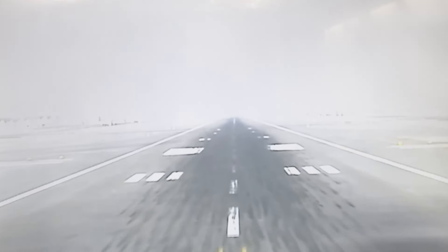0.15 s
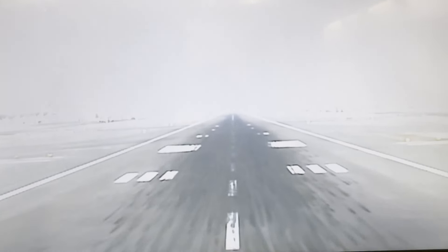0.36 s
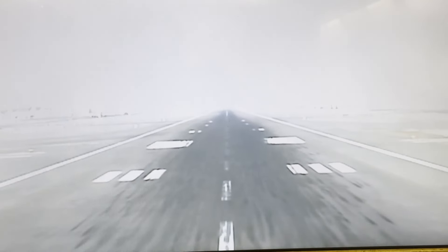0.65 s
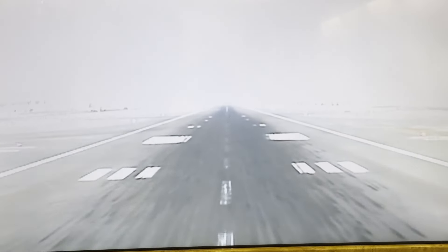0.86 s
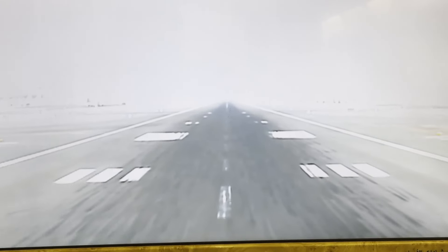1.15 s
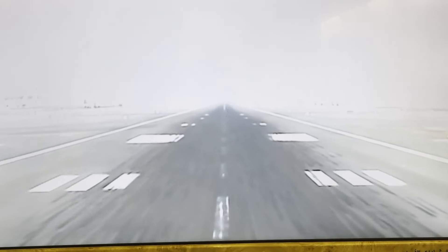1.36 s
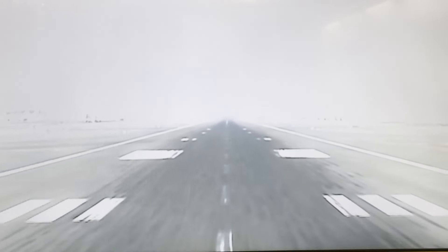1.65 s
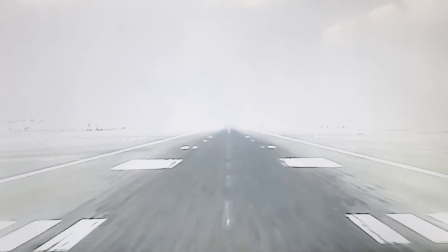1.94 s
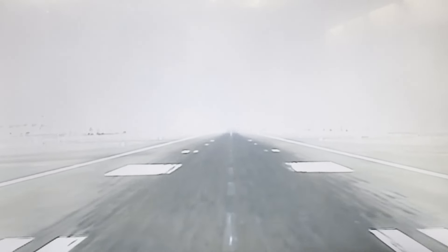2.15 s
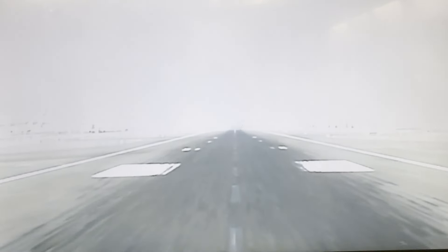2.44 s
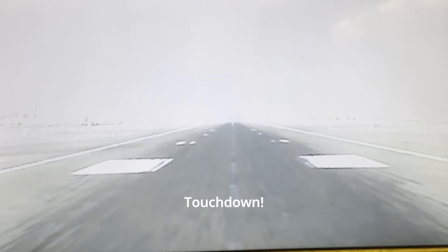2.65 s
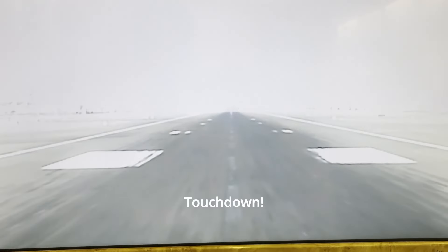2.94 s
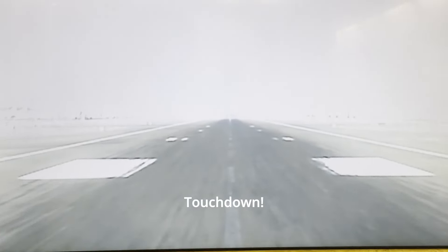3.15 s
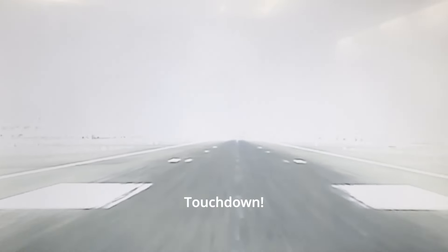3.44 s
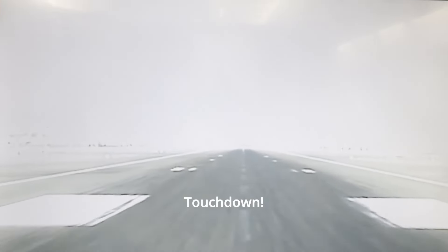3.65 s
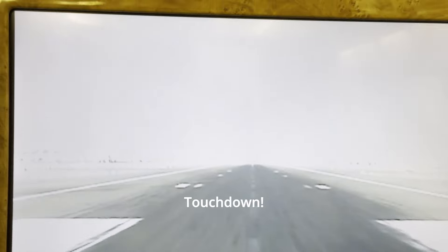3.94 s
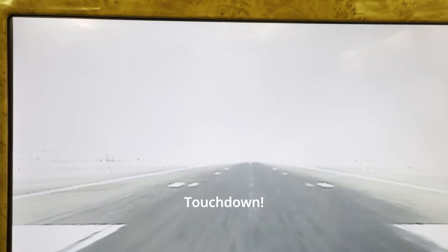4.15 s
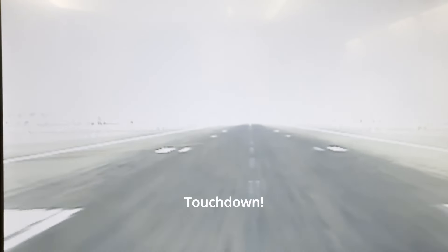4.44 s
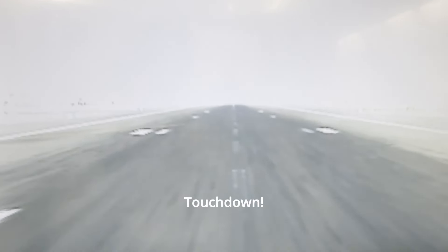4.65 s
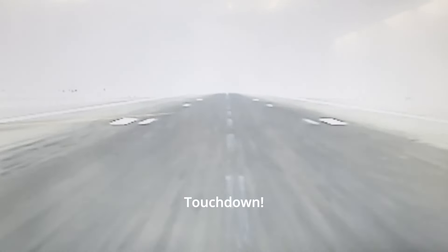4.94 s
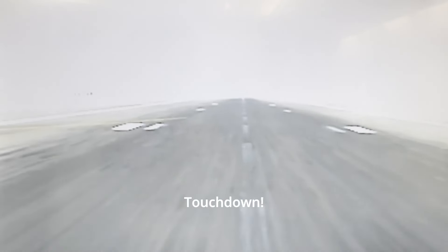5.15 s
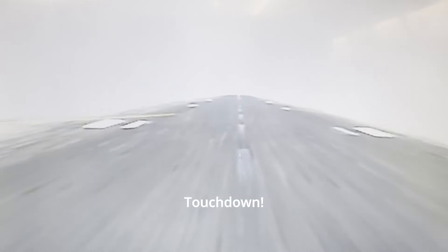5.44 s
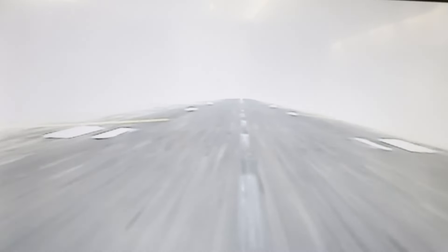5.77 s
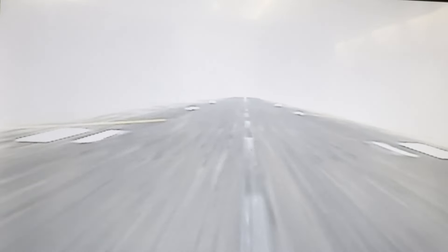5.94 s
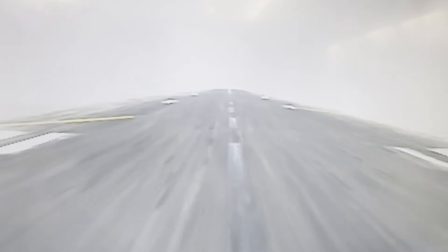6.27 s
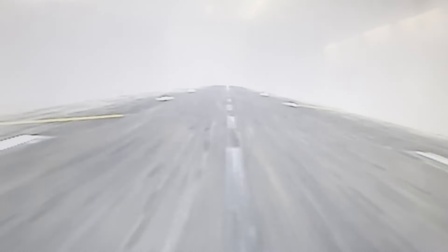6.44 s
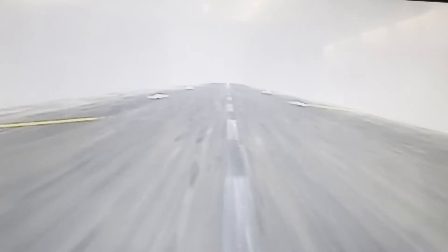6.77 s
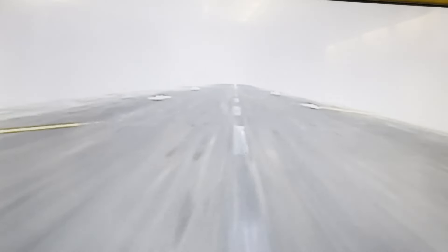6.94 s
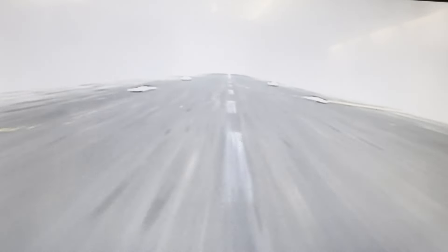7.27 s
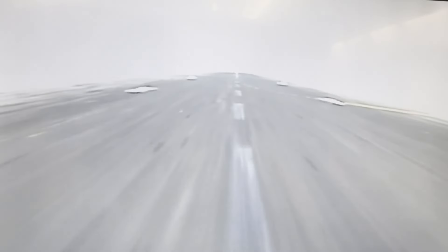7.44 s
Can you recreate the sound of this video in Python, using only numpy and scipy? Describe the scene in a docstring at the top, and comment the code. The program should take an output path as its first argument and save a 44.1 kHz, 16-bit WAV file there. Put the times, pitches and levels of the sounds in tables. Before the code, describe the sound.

Inside an airliner cabin, low air rush and thin fan whine, then a violent multi-thump touchdown with rattling trim, and a rumbling runway roll.

```python
"""Landing gear of an airliner meets the runway, heard from a cabin seat: each blow is a dispersed bending wave
plus decaying sines, over a fuselage boom of resonant noise that swells in timed surges.
Before touchdown, filtered noise makes the air rush and wavering sines the fan whine.
The tyre groan is narrow noise and the rolling roar wide noise; the nose wheel comes down later.
Trim rattles in clicks, joints creak, panels squeak as gliding tones, loose things chatter and scrape."""
import sys
import numpy as np
from scipy import signal
from scipy.fft import rfft, irfft, next_fast_len
from scipy.io import wavfile
from scipy.ndimage import uniform_filter1d

SR = 44100
rng = np.random.default_rng(int(sys.argv[2]) if len(sys.argv) > 2 else 0)


def wav_record(signal):
    """Record a signal, one row per channel, as 16-bit PCM in the file named by sys.argv[1]."""
    frames = np.transpose(np.atleast_2d(signal))
    bounded = np.clip(frames, -1, 1)
    # unit amplitude maps onto the largest positive 16-bit level
    quanta = np.round(bounded * 32767).astype(np.int16)
    wavfile.write(sys.argv[1], SR, quanta)


N = 335601
T = np.arange(N) / SR
SIZE = next_fast_len(N + 8192)
FREQ = np.maximum(np.arange(SIZE // 2 + 1) * SR / SIZE, 1)
SIDES = np.array([[1], [-1]])  # left, right
MAIN_TOUCH_S, NOSE_TOUCH_S = 2.36, 4.1


def undb(db):
    """Decibels to amplitude gain."""
    return 10 ** (np.asarray(db) / 20)


def unit(x):
    """Scale to rms 1."""
    return x / np.sqrt(np.mean(x ** 2))


def curve(rows):
    """Gain over time from (time_s, level_db) rows."""
    return undb(np.interp(T, *np.transpose(rows)))


def response(points):
    """Gain over frequency from (freq_hz, level_db) points, falling away beyond both ends."""
    hz, db = np.transpose(points)
    skirts = (np.minimum(FREQ / hz[0], 1) * np.minimum(hz[-1] / FREQ, 1)) ** 2
    return undb(np.interp(np.log(FREQ), np.log(hz), db)) * skirts


def resonances(modes):
    """Gain over frequency from (freq_hz, width_hz, level_db) resonances."""
    power = 0
    for hz, width_hz, db in modes:
        detune = (FREQ - hz) / (.75 * width_hz)
        power = power + undb(db) ** 2 / (1 + detune ** 2) ** 2
    return np.sqrt(power)


def above(corner_hz):
    """Gain of a gentle treble band starting at the corner."""
    return 1 - 1 / (1 + (FREQ / corner_hz) ** 4)


def filtered(x, gain):
    """Apply a frequency response."""
    return irfft(rfft(x, SIZE) * gain, SIZE)[..., :N]


def noise():
    """Two unrelated white noises."""
    return rng.standard_normal((2, N))


# Stereo width of the cabin's sound field: freq_hz, side_minus_mid_db
PORT_WIDTH = [(30, -32.5), (110, -16), (200, -12.5), (400, -10.5), (700, -6), (1300, -4.5), (2300, -17.5),
              (4400, -16), (8500, -100), (16000, 9.5)]


def diffuse(pair, gain):
    """Colour two unrelated signals and mix them as the cabin's sound field reaches both ports."""
    mid = filtered(pair[0], gain)
    side = filtered(pair[1], gain * response(PORT_WIDTH))
    return unit(np.array([mid + side, mid - side]))


def walk(rate_hz):
    """Smooth random wander with spread 1."""
    return unit(filtered(rng.standard_normal(N), np.exp(-(FREQ / rate_hz) ** 2)))


def steadied(x, window_s):
    """Even out the chance swells of a narrow noise."""
    power = uniform_filter1d(np.mean(x ** 2, axis=0), int(window_s * SR))
    return x / np.sqrt(power + 1e-6)


def decay(start_s, t60_s, rise_s):
    """Envelope of a blow: quick rise, exponential fall."""
    age = np.maximum(T - start_s, 0)
    return (1 - np.exp(-age / rise_s)) * np.exp(-np.minimum(np.log(1000) * age / t60_s, 50))


def held(start_s, hold_s, t60_s, rise_s):
    """Envelope of a sustained contact: linear rise, hold, exponential fall."""
    attack = np.clip((T - start_s) / rise_s, 0, 1)
    return attack * np.exp(-np.log(1000) * np.maximum(T - start_s - hold_s, 0) / t60_s)


# Spectrum of air rushing along the hull: freq_hz, relative_db
AIR_SPECTRUM = [(60, 2), (105, 2.5), (133, 0), (170, -1), (300, -12.5), (440, -15), (700, -21),
                (1050, -26.5), (1580, -28.5), (1900, -34), (3000, -35.5), (3800, -42.5), (6500, -42),
                (8800, -43.5), (12000, -44.5), (16000, -48)]
# Resonances sung by the passing air: freq_hz, width_hz, relative_db
AIR_HUMS = [(79.7, 8.4, 4.5), (163.2, 24, 7), (257.6, 53, -5.5), (439, 51, -11)]


def airflow(level_db=-28, hum_db=-33, flutter_db=1.55, rollout_db=-3.0, hum_left_db=3.0):
    """Turbulent air along the hull flutters slightly and eases as the aircraft slows."""
    rush = diffuse(noise(), response(AIR_SPECTRUM)) * undb(level_db + flutter_db * walk(4.5))
    hum_level_db = hum_db + flutter_db * walk(11) + hum_left_db * SIDES / 2
    hum = diffuse(noise(), resonances(AIR_HUMS)) * undb(hum_level_db)
    return (rush + hum) * curve([(2.6, 0.0096), (4.5, rollout_db)])


# Whine of fans and turbines: pitch_hz, level_db (rms, before flicker and the landing fade)
BLADE_TONES = [(1511, -57.5), (1588, -73), (3203, -80), (5958, -68), (6121, -77), (6713, -76.5)]


def fans(approach_db=-1, rollout_db=-3, waver_ratio=0.001, flicker_db=1.8,
         sough_hz=1590, sough_width_hz=130, sough_db=-57.5):
    """Rotating blades give thin wavering tones, in a narrow sough of air."""
    tones = 0
    for hz, db in BLADE_TONES:
        phase = 2 * np.pi * np.cumsum(hz * (1 + waver_ratio * walk(12.5))) / SR
        tones = tones + np.sqrt(2) * np.sin(phase) * undb(db + flicker_db * walk(3.5))
    sough = diffuse(noise(), resonances([(sough_hz, sough_width_hz, 0)])) * undb(sough_db)
    return tones * curve([(2.4, approach_db), (4.5, rollout_db)]) + sough


# Hull surges as struts bounce and wheels cross bumps: centre_s, length_s, level_db
HULL_SURGES = [(2.424, 0.11, -20), (2.506, 0.081, -10.5), (2.638, 0.058, -5), (2.696, 0.072, -9),
               (2.826, 0.043, -7), (2.882, 0.038, -6), (3.072, 0.17, -16), (3.257, 0.1, -14.5),
               (3.357, 0.045, -19), (3.5, 0.029, -17.5), (4.153, 0.068, -9), (4.288, 0.07, -11),
               (4.384, 0.069, -10.5), (4.51, 0.063, -12), (4.644, 0.1, -17), (4.803, 0.088, -14.5),
               (5.008, 0.083, -18.5), (5.2, 0.074, -20), (5.413, 0.11, -15.5), (5.852, 0.033, -14.5),
               (6.016, 0.06, -18), (6.15, 0.18, -21.5), (6.325, 0.14, -18.5), (6.586, 0.073, -19),
               (6.808, 0.12, -22), (7.224, 0.09, -16.5), (7.578, 0.031, -31)]
# steady shaking in each phase
FLIGHT_DB, MAIN_WHEELS_DB, ALL_WHEELS_DB = -27.5, -23.5, -21.5


def shaking_hull(settle_s=0.089, buffet_db=1.5, buffet_hz=6.8):
    """The hull shakes more with each set of wheels down, and surges on bounces and bumps."""
    main, nose = (np.clip((T - s) / settle_s + .5, 0, 1) for s in (MAIN_TOUCH_S, NOSE_TOUCH_S))
    steady_db = FLIGHT_DB + main * (MAIN_WHEELS_DB - FLIGHT_DB) + nose * (ALL_WHEELS_DB - MAIN_WHEELS_DB)
    power = undb(steady_db + buffet_db * walk(buffet_hz)) ** 2
    for centre_s, length_s, db in HULL_SURGES:
        offset = 2 * (T - centre_s) / length_s
        power = power + undb(db) ** 2 * np.exp(-np.minimum(offset ** 2, 50))
    return np.sqrt(power)


# Lowest resonances of the fuselage: freq_hz, width_hz, relative_db
FUSELAGE_MODES = [(42, 29, -9.5), (57.2, 11.4, 5.5), (74, 30.7, -3), (104.6, 6.8, -4)]


def fuselage(window_s=0.0436, judder_hz=53, judder_width_hz=8, heavy_db=-11):
    """The hull booms in its lowest resonances; under the heaviest load a single judder takes over."""
    shake = shaking_hull()
    load = 1 / (1 + (undb(heavy_db) / shake) ** 4)
    boom = steadied(diffuse(noise(), resonances(FUSELAGE_MODES)), window_s)
    judder = steadied(diffuse(noise(), resonances([(judder_hz, judder_width_hz, 0)])), window_s)
    return (np.sqrt(1 - load) * boom + np.sqrt(load) * judder) * shake


# Squeaks of plastic panels: centre_s, pitch_hz, half_length_s, level_db (before grip and overtone),
# glide_ratio (of pitch), roughness_ratio (of pitch)
PANEL_SQUEAKS = [(0.735, 3050, .15, -57, .008, .008), (0.76, 3205, .09, -50.5, -0.0028, 0.019),
                 (2.714, 2970, 0.02, -34.5, 0.046, .012), (2.783, 2700, .022, -37, 0.01, 0.0068),
                 (3.069, 3010, 0.022, -40, 0.032, 0.022), (3.128, 3350, 0.019, -51, 0, .02),
                 (3.605, 2460, .07, -48, 0, .05), (4.295, 1113, 0.027, -44, 0.0028, .02),
                 (4.416, 1050, 0.024, -46, 0, .03), (4.522, 3140, 0.042, -46.5, 0.0026, 0.016),
                 (4.613, 1070, 0.027, -42, 0, .03), (5.992, 1070, 0.027, -46, -0.012, 0.035),
                 (6.208, 1090, 0.025, -40, -0.0074, 0.044), (6.291, 1113, 0.022, -37, -0.012, 0.04),
                 (6.331, 3030, 0.036, -44.5, -.005, 0.02), (7.329, 2870, 0.033, -50, 0.0017, 0.021)]


def panels(overtone_db=-15, grip_db=3.0):
    """Plastic edges stick and slip in short, uneven squeaks; some glide up or down."""
    out, unrest, grip = np.zeros(N), walk(260), undb(grip_db * walk(120))
    for centre_s, hz, half_s, db, glide, rough in PANEL_SQUEAKS:
        near = np.abs(T - centre_s) < half_s
        stroke = (T[near] - centre_s) / half_s
        phase = 2 * np.pi * hz * np.cumsum(1 + rough * unrest[near] + glide * stroke) / SR
        swell = np.cos(np.pi / 2 * stroke) ** 4
        tone = np.sin(phase) + undb(overtone_db) * np.sin(2 * phase)
        out[near] += undb(db) * swell * np.sqrt(2) * tone
    return out * grip


# Spells of load on the wheels (first brush, touchdown, full weight, rebound, nose wheel touching and
# settling, rough pavement): start_s, hold_s, t60_s, roar_db, rattle_db (before each source's own trim)
WHEEL_LOADS = [(2.38, 0.13, .25, -25.5, -56), (2.48, 0.15, 0.45, -22.5, -32), (2.641, 0.12, 1.22, -19, -33),
               (2.835, 0.023, 1, -25, -59), (3.03, 0.047, 2, -22, -43), (4.121, 0.27, 0.71, -29.5, -47.5),
               (4.341, 0.27, 0.8, -27.5, -44.5), (5.079, 0.23, .6, -57, -47), (5.273, 0.062, .2, -51, -49),
               (5.775, 0.24, 0.34, -42, -45.5), (6.033, 0.34, 0.52, -37, -42), (7.223, 0.56, .5, -34, -47)]
ROLL_ROAR_DB, ROLL_RATTLE_DB = -36.5, -47.5  # smooth pavement, before the same trim


def loaded(steady_db, column):
    """Each spell of wheel load rises, holds and dies away, adding power to a steady level."""
    power = undb(steady_db) ** 2
    for start_s, hold_s, t60_s, roar_db, rattle_db in WHEEL_LOADS:
        db = {"roar": roar_db, "rattle": rattle_db}[column]
        power = power + (undb(db) * held(start_s, hold_s, t60_s, rise_s=0.022)) ** 2
    return np.sqrt(power)


# Spectrum of the roar through the floor: freq_hz, relative_db
ROAR_SPECTRUM = [(80, -18), (115, 8), (160, 0), (250, -2.5), (400, -12.5), (700, -20.5), (1200, -27.5),
                 (2200, -36.5)]


def rolling(level_db=-1, rough_db=1.5):
    """Tyres and engines roar through the floor, roughened by the uneven pavement."""
    on_ground = np.clip((T - MAIN_TOUCH_S) / 0.13, 0, 1)
    roar = steadied(diffuse(noise(), response(ROAR_SPECTRUM)), 0.06)
    return roar * undb(level_db + rough_db * walk(27)) * loaded(ROLL_ROAR_DB, "roar") * on_ground


def clatter(slaps_per_s=130, scatter_db=5, slap_share=0.3, slap_t60_s=0.036):
    """Panels slap at uneven intervals: each slap starts hard and dies quickly, over a steady remainder."""
    late, size = rng.random((int(T[-1] * slaps_per_s), 2)).T
    index = ((np.arange(len(late)) + late) * SR / slaps_per_s).astype(int)
    slaps = np.zeros(N)
    slaps[index] = undb(scatter_db * np.minimum(-np.log(1 - size), 2))
    keep = np.exp(-2 * np.log(1000) / (slap_t60_s * SR))  # power kept per sample
    power = signal.lfilter([1], [1, -keep], slaps ** 2)
    return np.sqrt(1 - slap_share + slap_share * power / power.mean())


# Spectrum of rattling panels and bins: freq_hz, relative_db
TRIM_SPECTRUM = [(400, 11.5), (800, 9.5), (1150, 6.5), (1650, 4.5), (2150, 1.5), (3000, -1), (3900, -6.5),
                 (6800, -6.5), (8700, -9.5), (12000, -10.5), (16000, -14.5)]


def trim(level_db=3, clicks_per_s=5000, scatter_db=2.0, rub=1.0, flicker_db=1.83):
    """Panels and bins rattle in dense tiny clicks and rubbing noise, louder on each slap."""
    struck = rng.random(N) < clicks_per_s / SR
    clicks = noise() * struck * undb(scatter_db * np.minimum(rng.exponential(size=N), 4))
    # every click rings on in its panel for a few milliseconds
    ring = rfft(rng.standard_normal(400) * np.exp(-T[:400] / .0015), SIZE)
    grains = unit(filtered(clicks, ring / np.abs(ring))) + rub * noise()
    rattle = diffuse(grains, response(TRIM_SPECTRUM)) * clatter()
    on_ground = np.clip((T - MAIN_TOUCH_S) / 0.037, 0, 1)
    level = undb(level_db + flicker_db * walk(28)) * loaded(ROLL_RATTLE_DB, "rattle")
    return rattle * level * on_ground


def creaks(level_db=-3, ring_t60_s=0.032, scatter_db=2.0, low_hz=850, high_hz=3600,
           tilt_db_per_octave=-5, count=800):
    """Bin joints slip at random, each ringing at its own pitch; shaking makes them denser and louder."""
    length = SR // 10
    out, age = np.zeros((2, N + length)), T[:length]
    shaking = np.sqrt(loaded(ROLL_RATTLE_DB, "rattle") / undb(ROLL_RATTLE_DB)) * (T > MAIN_TOUCH_S)
    slips = np.cumsum(shaking ** 2)
    envelope = np.exp(-np.log(1000) * age / ring_t60_s) * (1 - np.exp(-age / 0.0011))
    for when, pitch, size, place in rng.random((count, 4)):
        start = np.searchsorted(slips, when * slips[-1])
        hz = low_hz * (high_hz / low_hz) ** pitch
        db = ROLL_RATTLE_DB + level_db + tilt_db_per_octave * np.log2(hz / low_hz)
        db += scatter_db * min(-np.log(1 - size), 2)
        grain = np.sin(2 * np.pi * hz * age) * envelope
        balance = 1 + SIDES * (place - .5) * low_hz / hz
        out[:, start:start + length] += 2 * undb(db) * shaking[start] * balance * grain
    return out[:, :N]


# Groan and squeal of skidding: freq_hz, width_hz, level_db (rms)
SKID_MODES = [(153, 20, -23.5), (2420, 22, -60), (2830, 14, -53)]


def skid(start_s=2.485, hold_s=0.19, t60_s=0.28, rise_s=0.0077, window_s=0.062):
    """While the main tyres spin up to speed, the gear groans and squeals thinly."""
    out = 0
    for hz, width_hz, db in SKID_MODES:
        voice = steadied(diffuse(noise(), resonances([(hz, width_hz, 0)])), window_s)
        out = out + undb(db) * voice
    return out * held(start_s, hold_s, t60_s, rise_s)


# Blows of the landing gear: start_s, peak_db (before the wall reflection), brightness_hz, boom_db
GEAR_BLOWS = [(2.489, -6, 675, -5.5), (2.761, -6.5, 565, -5), (2.7743, -2, 840, -1), (2.9011, -1, 690, -5),
              (3.0355, -1.5, 900, -2), (3.073, -8, 500, -2), (3.117, -14, 553, -4), (3.152, -18, 450, -3),
              (3.339, -15, 350, 0), (4.352, -19, 454, 5), (4.394, -13, 332, 0), (4.413, -13, 404, 0),
              (4.461, -7.5, 367, 0), (4.954, -13, 306, 4), (6.165, -18.5, 650, -12), (6.179, -19, 650, -14),
              (6.391, -16.5, 750, -4), (7.571, -13, 376, 4)]
# Spectrum of the bending wave: freq_hz, relative_db
KNOCK_SPECTRUM = [(45, -21), (90, 16.5), (170, 8), (400, 1), (900, -17.5)]
# Ring of the struts: freq_hz, t60_s, relative_db
STRUT_MODES = [(366, 0.038, -8), (458, 0.04, -9), (613, 0.031, -13.5)]
# Boom of the airframe: freq_hz, t60_s, relative_db
AIRFRAME_MODES = [(58.7, 0.051, -6.5), (83, 0.13, -3.5)]


def gear(dispersion=0.1472, rise_s=0.00087, spread=0.62, strut_lag_s=0.002):
    """Each strut blow travels as a bending wave, highs before lows, while struts and airframe ring."""
    count = SR // 4

    def ring(modes, lag_s):
        """Sum of decaying sines."""
        out = 0
        for hz, t60_s, db in modes:
            out = out + undb(db) * np.sin(2 * np.pi * hz * (T - lag_s)) * decay(lag_s, t60_s, rise_s)
        return out[:count]

    # delay falls as 1 / sqrt(frequency), reaching zero at 1500 Hz
    bending = np.exp(-2j * np.pi * dispersion * (2 * np.sqrt(FREQ) - FREQ / np.sqrt(1500)))
    wave = irfft(response(KNOCK_SPECTRUM) * bending, SIZE)[:count]
    knock = wave / np.abs(wave[SR // 1000:]).max() + ring(STRUT_MODES, strut_lag_s)
    boom = ring(AIRFRAME_MODES, 0)
    out = np.zeros(N + count)
    for start_s, db, bright_hz, boom_db in GEAR_BLOWS:
        # a softer contact has less treble
        softness = signal.butter(4, bright_hz, fs=SR, output="sos")
        thud = signal.sosfilt(softness, knock + undb(boom_db) * boom)
        start = int(start_s * SR)
        out[start:start + count] += undb(db) * thud / np.abs(thud).max()
    out = out[:N]
    # a 3 ms reflection from the cabin wall reaches the two ports unequally
    reflection = filtered(out, np.exp(-2j * np.pi * FREQ * .003) * response(PORT_WIDTH))
    return out + spread * SIDES * reflection


# Resonances of the floor and seat frames: freq_hz, width_hz, relative_db
FLOOR_MODES = [(147, 58, -1), (223, 99, -3), (342, 110, 6.5), (510, 140, -8.5)]


def shudder(level_db=-28.0, t60_s=0.11, rise_s=0.0028):
    """After each blow the floor and seat frames shudder on as resonant noise."""
    after = sum(undb(db) * decay(s, t60_s, rise_s) for s, db, *_ in GEAR_BLOWS)
    return diffuse(noise(), resonances(FLOOR_MODES)) * undb(level_db) * after


# Loose fittings that crack and chatter: start_s, level_db (before roughness), t60_s, extra_treble_db
FITTING_CHATTERS = [(2.49, -37.5, 0.033, -20), (2.51, -36, .025, -11), (2.537, -30, 0.021, -16),
                    (2.582, -36, 0.026, -11), (2.666, -36, 0.045, 13), (2.68, -44, 0.3, 7),
                    (2.709, -37, .03, 5), (2.728, -31, 0.056, 3), (2.775, -31, 0.039, 4),
                    (2.982, -27, 0.056, -23), (3.122, -36, 0.033, -5), (3.385, -37, 0.17, -17),
                    (3.785, -38.5, 0.064, -5.5), (3.985, -41, .07, 1), (4.159, -46, 0.085, 7),
                    (4.282, -46, 0.043, 9), (4.305, -38.5, 0.054, 5), (4.381, -42, .04, 11),
                    (4.443, -34, 0.067, -5), (4.601, -38, 0.21, 2), (5.815, -40, 0.42, -5),
                    (5.953, -45.5, 0.092, 13.5), (6.092, -45, .08, 12.5), (6.137, -47.5, 0.054, 17),
                    (6.21, -38, .05, 0), (7.24, -42, 0.37, 3)]
# Spectrum of a fitting: freq_hz, relative_db
FITTING_SPECTRUM = [(600, -8), (1700, 9), (3200, -1), (4500, -4.5), (7000, -0.5), (10000, -4), (16000, -29)]


def fittings(rough_db=1.5, treble_hz=4500):
    """Latches and loose parts crack and chatter, each with its own brightness and decay."""
    rattle = diffuse(noise(), response(FITTING_SPECTRUM)) * undb(rough_db * walk(150))
    treble = filtered(rattle, above(treble_hz))
    out = 0
    for start_s, db, t60_s, treble_db in FITTING_CHATTERS:
        coloured = rattle + (undb(treble_db) - 1) * treble
        out = out + undb(db) * decay(start_s, t60_s, 0.00073) * coloured
    return out


# Loose things sliding under the braking: start_s, hold_s, t60_s, level_db (before roughness),
# centre_hz, width_hz
LOOSE_SCRAPES = [(6.778, .02, 0.23, -50, 6200, 1500), (7.065, 0.019, .26, -43, 4900, 2700),
                 (7.413, 0.018, .12, -51, 5800, 2600), (7.577, 0.033, .1, -54, 5500, 3000)]


def scrapes(rise_s=0.0084, rough_db=3.5):
    """Loose things slide a little way: an airy scrape that starts quickly, holds and fades."""
    out, grip = 0, undb(rough_db * walk(108))
    for start_s, hold_s, t60_s, db, hz, width_hz in LOOSE_SCRAPES:
        air = diffuse(noise(), resonances([(hz, width_hz, 0)]))
        out = out + undb(db) * held(start_s, hold_s, t60_s, rise_s) * air
    return out * grip


def scene():
    """Everything that reaches the seat."""
    small_joints = creaks(level_db=-9.5, ring_t60_s=0.045, scatter_db=-1.5, low_hz=2660, high_hz=3520,
                          tilt_db_per_octave=-1.5, count=500)
    cabin = panels() + trim() + creaks() + small_joints + fittings() + scrapes()
    return airflow() + fans() + fuselage() + rolling() + skid() + gear() + shudder() + cabin


# Moments when the treble dips: start_s, end_s
TREBLE_DIPS = [(2.467, 2.489), (2.764, 2.773), (2.976, 2.982), (3.001, 3.034), (3.107, 3.121),
               (4.463, 4.470), (4.935, 4.947)]
# Phase by which the left port leads: freq_hz, lead_rad
LEFT_LEAD = [(6700, 0), (7250, 1.1), (7750, 3.0), (9250, 3.0), (9800, 2.3), (11600, 1.8), (15000, .9)]


def record(dry, dip_hz=1400, dip_db=-18, low_cut_hz=30, top_hz=15850, ceiling=.96):
    """The treble dips briefly, the ports differ in phase at the top, peaks are rounded, both ends cut."""
    dips = sum(1. * ((T > start_s) & (T < end_s)) for start_s, end_s in TREBLE_DIPS)
    dipped = uniform_filter1d(dips, size=60)
    sound = dry - (1 - undb(dip_db)) * dipped * filtered(dry, above(dip_hz))
    lead = np.interp(FREQ, *np.transpose(LEFT_LEAD))
    low_cut = 1 / np.sqrt(1 + (low_cut_hz / FREQ) ** 8)
    sound = filtered(sound, low_cut * np.exp(.5j * SIDES * lead))
    sound = sound / (1 + (sound / ceiling) ** 8) ** (1 / 8)
    return filtered(sound, 1 / (1 + (FREQ / top_hz) ** 400))


dry = scene()
out = record(dry)
wav_record(out)
```